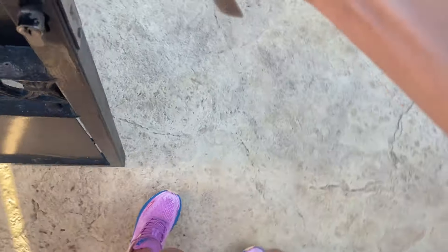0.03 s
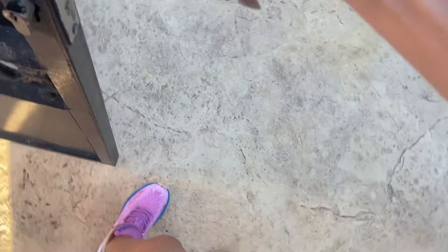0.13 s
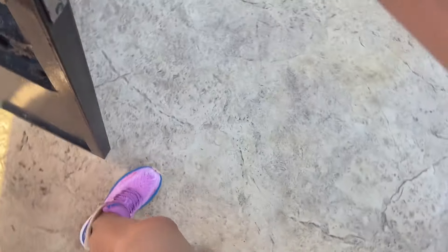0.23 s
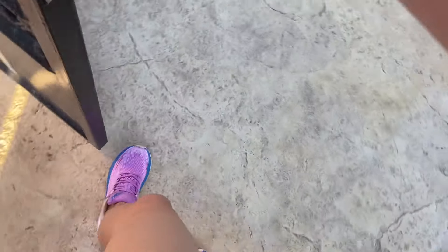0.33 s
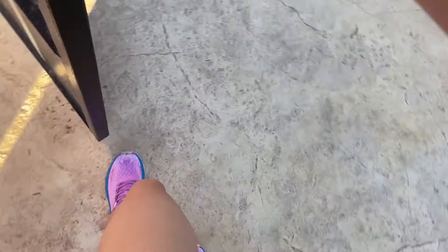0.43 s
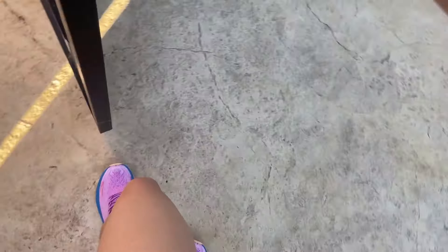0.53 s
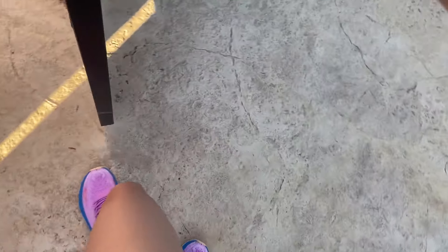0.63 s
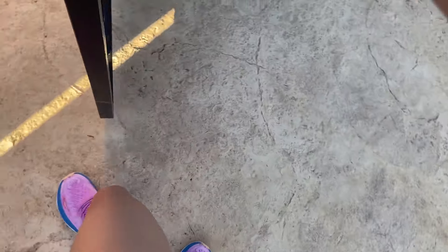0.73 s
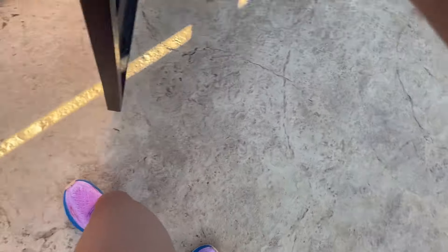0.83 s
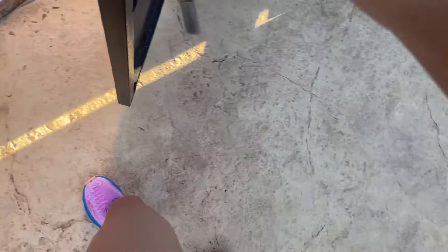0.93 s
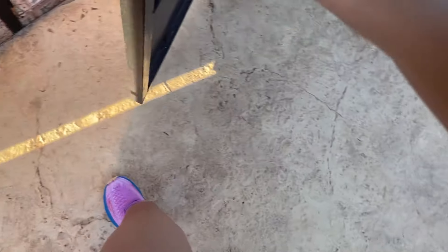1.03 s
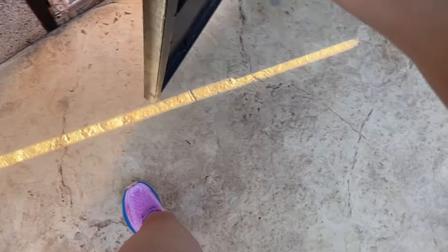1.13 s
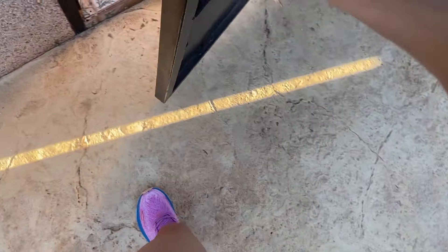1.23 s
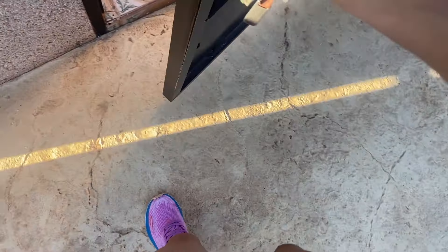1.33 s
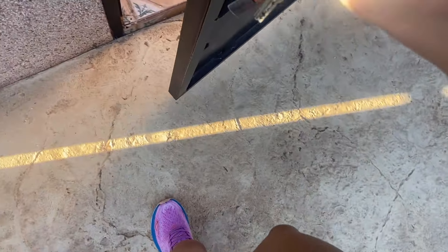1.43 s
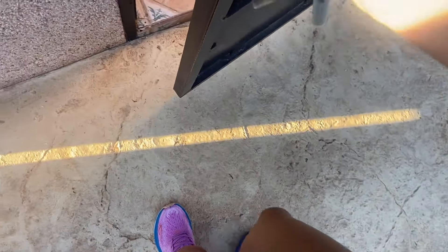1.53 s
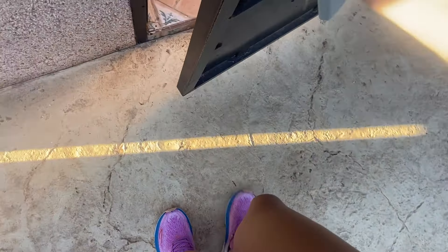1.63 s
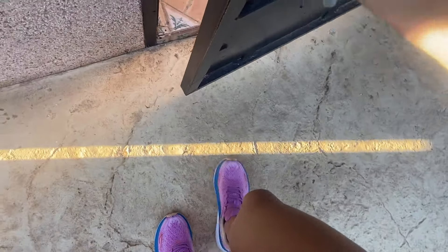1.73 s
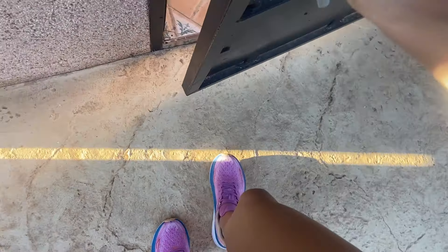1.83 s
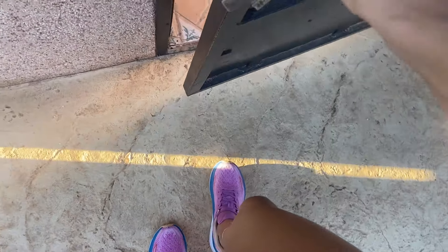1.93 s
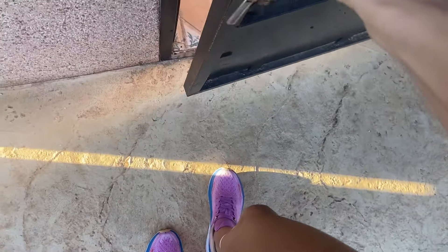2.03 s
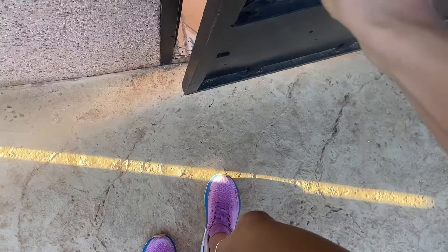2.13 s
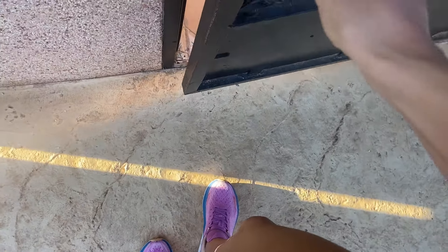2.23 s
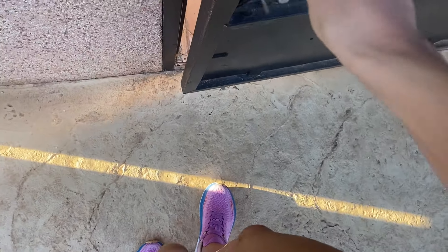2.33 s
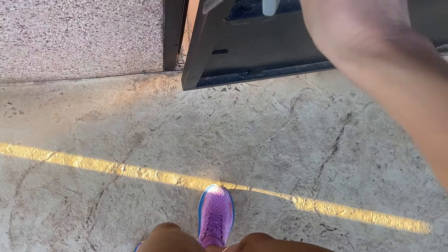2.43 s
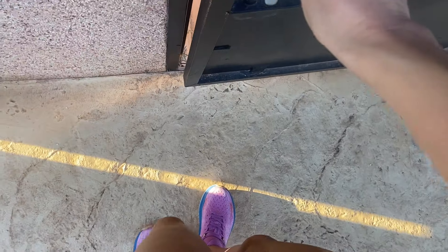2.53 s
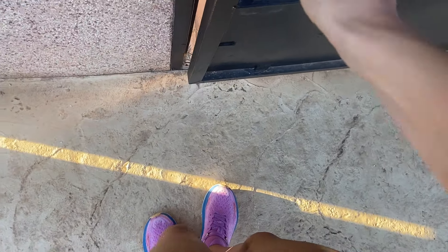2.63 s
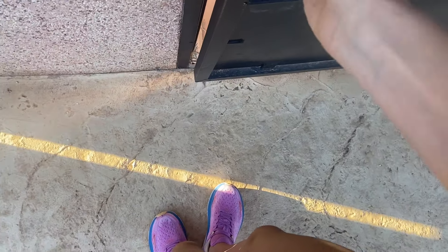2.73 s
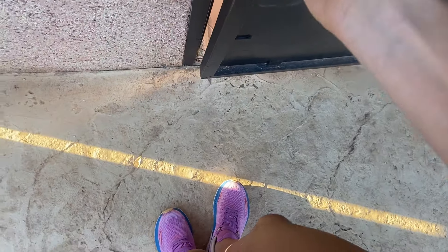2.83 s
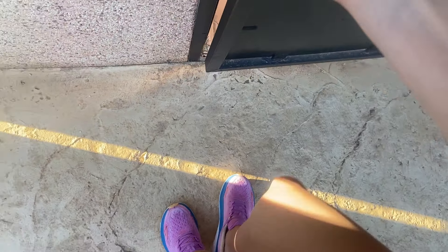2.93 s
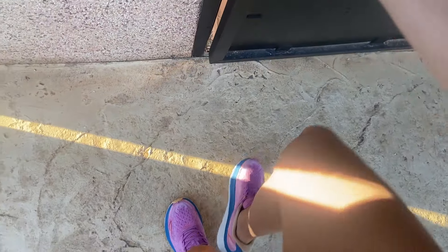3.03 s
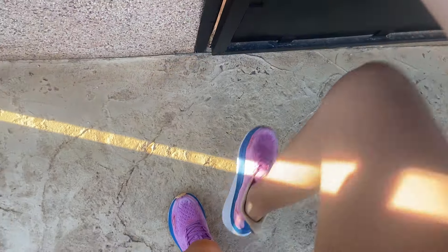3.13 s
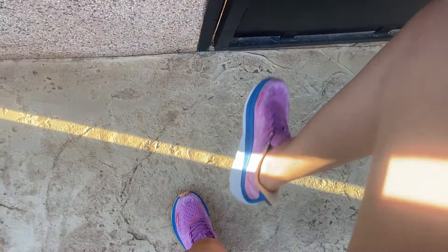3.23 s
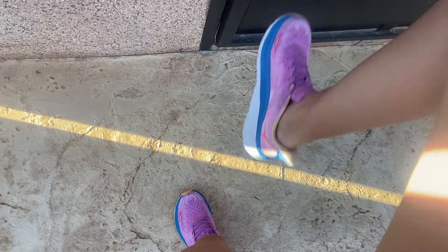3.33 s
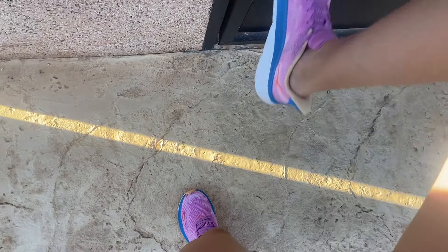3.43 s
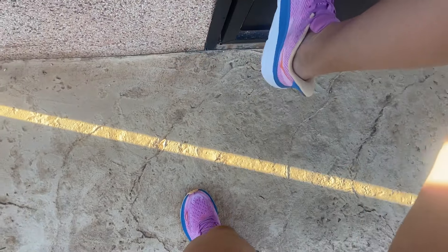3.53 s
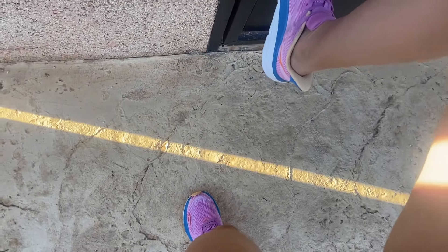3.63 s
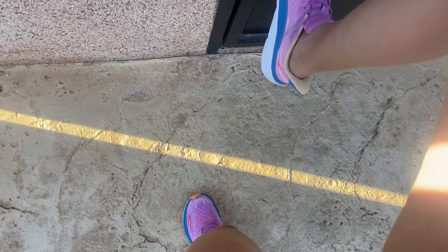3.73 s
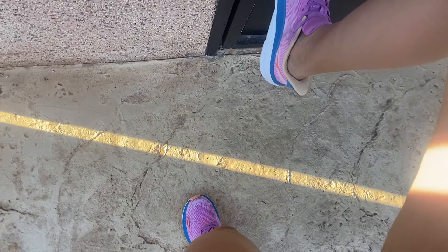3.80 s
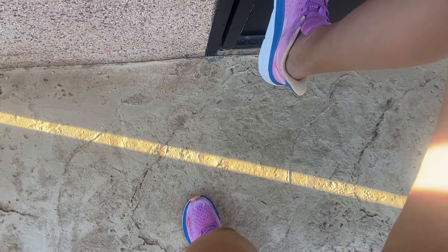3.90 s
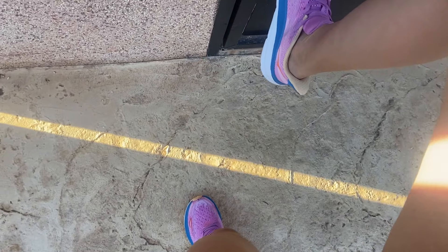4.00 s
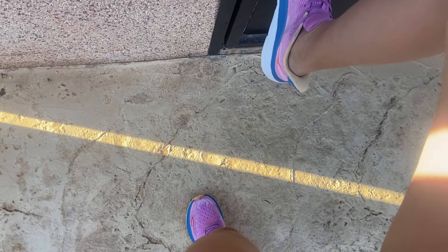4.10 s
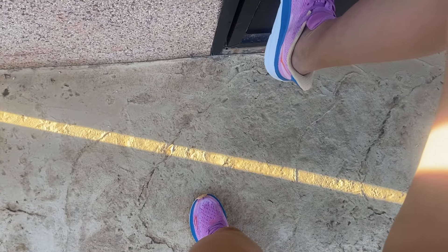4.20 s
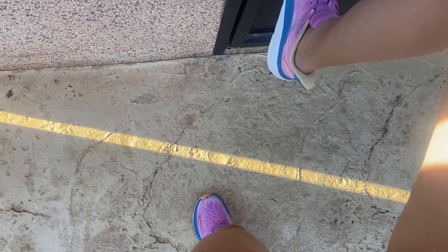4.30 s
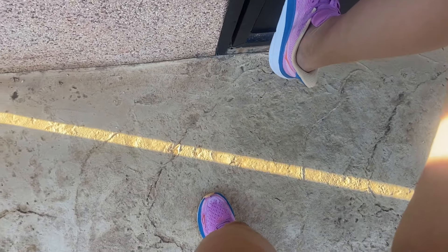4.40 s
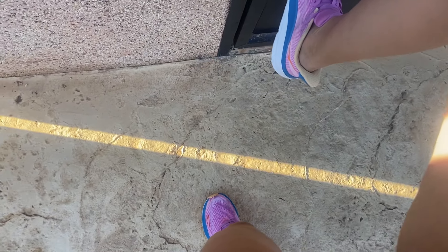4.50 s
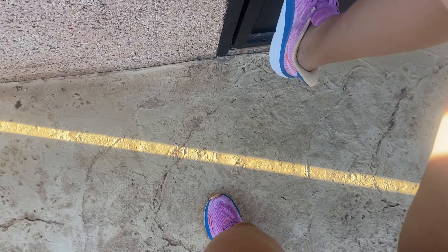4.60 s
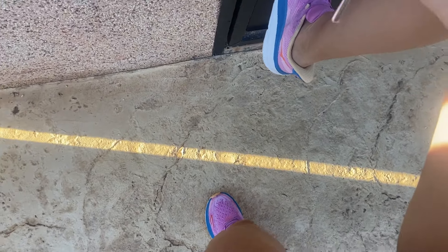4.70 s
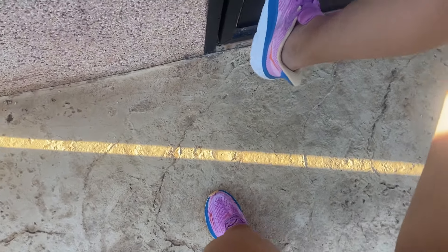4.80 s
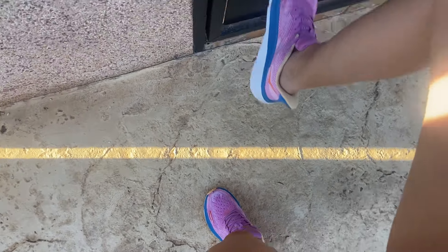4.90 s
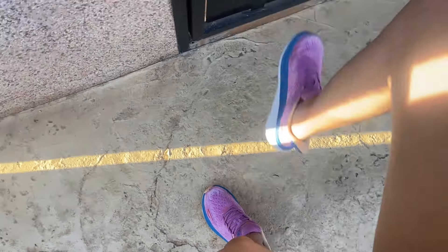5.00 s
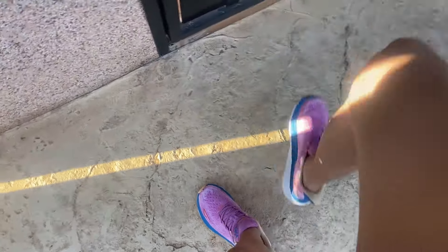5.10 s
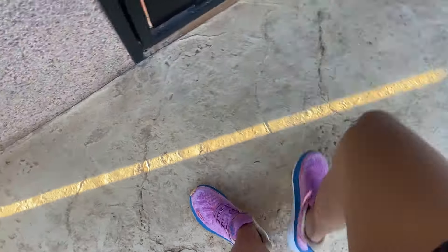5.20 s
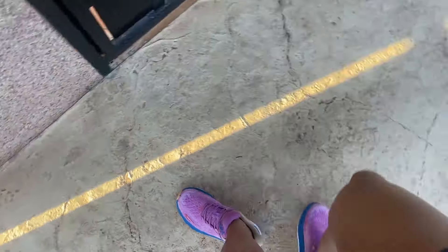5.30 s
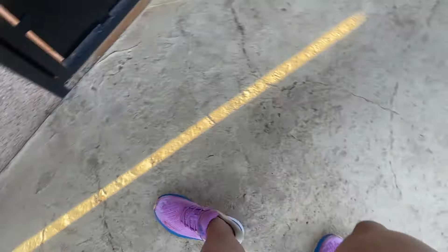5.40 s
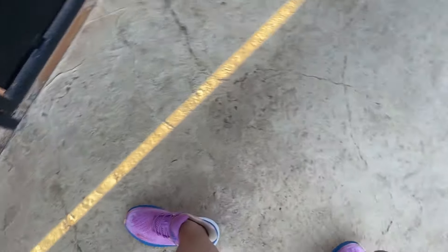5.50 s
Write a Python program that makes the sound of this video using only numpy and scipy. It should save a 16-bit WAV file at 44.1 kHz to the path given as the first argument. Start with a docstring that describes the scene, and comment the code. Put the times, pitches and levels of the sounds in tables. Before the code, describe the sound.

A metal gate's hinge squeaks in short high overlapping tones over gritty grinding for about half a second. Keys then clash and slide on their ring close by, with faint gate knocks and one soft low footfall. At about three and a half seconds the steel gate slams into its post with a massive low boom, followed by a latch click and more keys, over distant traffic. Close stereo pickup in a small hard yard, the slam slightly clipped.

```python
"""A sheet-steel gate, pushed to and kicked shut with a long low boom, in a concrete yard.
Blows ring the frame's modes and set off the panel's dying noise; post and latch bolt add short knocks.
Its hinge squeaks by even stick-slip and grinds; close by, keys clash and slide on their ring in a hand.
One soft footfall; the yard returns a short echo of hinge and keys; far traffic is shaped noise and a drone.
Two close microphone ports hear it all, with the lows and the top cut and a fast limiter on the peaks."""
import sys
import numpy as np
from scipy import signal
from scipy.fft import rfft, irfft, next_fast_len
from scipy.io import wavfile
from scipy.ndimage import uniform_filter1d, minimum_filter1d

SR = 44100
rng = np.random.default_rng(int(sys.argv[2]) if len(sys.argv) > 2 else 0)


def wav_record(signal):
    """Record a signal, one row per channel, as 16-bit PCM in the file named by sys.argv[1]."""
    frames = np.transpose(np.atleast_2d(signal))
    bounded = np.clip(frames, -1, 1)
    # unit amplitude maps onto the largest positive 16-bit level
    quanta = np.round(bounded * 32767).astype(np.int16)
    wavfile.write(sys.argv[1], SR, quanta)


N = 244755


def from_db(db):
    """Turn decibels into an amplitude factor."""
    return 10 ** (np.asarray(db) / 20)


def rms_one(x):
    """Scale x to an RMS of one."""
    return x / np.sqrt(np.mean(x ** 2) + 1e-20)


def in_time(rows):
    """Columns of a curve at every sample."""
    s, *columns = np.transpose(rows)
    return [np.interp(np.arange(N) / SR, s, c) for c in columns]


def at_hz(points, hz, column=1):
    """Read a column of a spectrum table at hz, along log frequency."""
    points = np.array(points)
    return np.interp(np.log(hz), np.log(points[:, 0]), points[:, column])


def colour(x, spectrum):
    """Give x a spectrum whose mean power gain is one, in minimum phase."""
    gain = from_db(at_hz(spectrum, np.linspace(1, SR / 2, 513)))
    response = np.roll(irfft(rms_one(gain)), 512)[1:]
    squared = np.convolve(response, response)   # minimum_phase takes the square root of its gain
    taps = signal.minimum_phase(squared, method="homomorphic")
    return signal.fftconvolve(x, taps)[:N]


def clicks(times_s, sizes):
    """Single-sample impulses at the given times."""
    out = np.full(N, 1e-18)
    samples = (np.asarray(times_s) * SR).astype(int)
    np.add.at(out, np.clip(samples, 0, N - 1), sizes)
    return out


def ring(x, hz, t60_s):
    """A damped mode: a unit click sets a sine of height 1 ringing."""
    r, w = from_db(-60 / (t60_s * SR)), 2 * np.pi * hz / SR
    return signal.lfilter([0, np.sin(w)], [1, -2 * r * np.cos(w), r * r], x)


# how alike far noise is at the two ports: pitch_hz, correlation (0 to 1)
PORT_LIKENESS = [(60, 0.99), (250, 0.99), (600, 0.54), (1200, 0.2), (2500, 0.4), (5000, 0.96),
                 (12000, 0.35)]


def bands():
    """Half-octave bands of stereo noise with their centres; neighbours are unrelated."""
    white = rng.standard_normal((2, 2, N))
    edges_hz = 25 * 2 ** np.arange(0, 9.6, .5)
    for k, (low, high) in enumerate(zip(edges_hz, edges_hz[1:])):
        band = signal.butter(2, [low, high], "band", fs=SR, output="sos")
        mid, side = signal.sosfilt(band, white[k % 2])
        hz = np.sqrt(low * high)
        alike = np.clip(at_hz(PORT_LIKENESS, hz), 0, 1)
        yield hz, np.sqrt(1 + alike) * mid + np.sqrt(1 - alike) * side * [[1], [-1]]


# blows on the gate: start_s, strength_db (relative), brightness_db (added towards the treble)
GATE_BLOWS = [(0.32, -45.5, 14.5), (1.613, -57.5, 38), (1.98, -31, 9), (2.651, -36.5, 10.5),
              (3.47, -22, -7.5), (3.497, -26, -34), (3.574, 2.5, -1.5), (3.672, -10.5, -4), (3.774, -26, 1),
              (3.922, -34.5, 23.5)]
# ringing modes of the gate's frame: pitch_hz, level_db (relative), t60_s
FRAME_MODES = [(54, 2, 2.6), (72.5, 0, 2.0), (91, -1, 1.8), (109, -1, 2.2), (145, -3, .7), (163.5, -9, 1.6),
               (168.6, 1, 2.3), (208, -8, 1.5), (228, -12, 1.8), (244, -9, 1.2), (275, -14, 1.2),
               (292, -4, 1.2), (319, -9, 1.1), (360, -15, 1.3), (447, -10, 1.6), (533, -13, 2.0),
               (556, -17, 1.0), (645, -13, 1.4), (738, -21, 1.2), (877, -17, 1.2), (1319, -26, 1.3)]
# the panel's dense modes with the yard's echo: pitch_hz, level_db (per Hz, relative), t60_s
PANEL_DECAY = [(30.2, -18.5, 0.83), (50, -1.5, 2.2), (149, -0.5, 2.16), (209, -6.5, 2.99), (299, -16, 2.46),
               (502, -12.5, 1.58), (620, -17.5, 1.9), (967, -14.5, 0.98), (1410, -23, 0.74),
               (2790, -22, 0.71), (4500, -29, 0.082), (6000, -41, 0.11), (12000, -39.5, 0.32),
               (15500, -62, 0.23)]
# the panel's lows pass through the frame's lowest modes, and leak past them
SHUDDER_T60_S, SHUDDER_DB, SHUDDER_LEAK_DB = .4, 5, -7


def treble_share(hz):
    """A bright blow favours the upper bands: 0 up to 150 Hz, 1 three octaves higher."""
    return np.clip(np.log2(hz / 150) / 3, 0, 1)


def gate_frame():
    """Blows ring the heavy frame's modes and the sheet's crowd of lesser modes."""
    s, strength_db, bright_db = np.transpose(GATE_BLOWS)
    frame = np.zeros(N)
    luck_db = rng.normal(0, 1.0, (len(s), len(FRAME_MODES)))
    for k, (hz, db, t60_s) in enumerate(FRAME_MODES):
        hit_db = strength_db + 0.42 * bright_db * treble_share(hz) + db - 10.0 + luck_db[:, k]
        hits = clicks(s, from_db(hit_db))
        frame += ring(hits, hz, t60_s) - ring(hits, hz, 32.0 / hz)   # takes some cycles to swing up
    for hz in 215 * 6.9 ** rng.random(70):   # the lesser modes
        sizes = from_db(strength_db + at_hz(PANEL_DECAY, hz) - 18.5) * rng.standard_normal(len(s))
        frame += ring(clicks(s, sizes), hz, at_hz(PANEL_DECAY, hz, column=2))
    return frame


def gate_panel(noise_bands):
    """Blows feed the sheet's noise, which dies band by band; its lows shudder through the frame."""
    s, strength_db, bright_db = np.transpose(GATE_BLOWS)
    panel, shudder = 0, 0
    for hz, noise in noise_bands:
        hit_db = strength_db + treble_share(hz) * bright_db + at_hz(PANEL_DECAY, hz) + 7.0
        hits = clicks(s, from_db(hit_db))
        fall = from_db(-60 / (at_hz(PANEL_DECAY, hz, column=2) * SR))
        crack = from_db(-60 / (0.075 * SR))   # a stronger, short first decay
        rise = np.exp(-hz / (1.5 * SR))       # lows build up over a few cycles
        envelope = signal.lfilter([1], [1, -fall], hits) + 4.1 * signal.lfilter([1], [1, -crack], hits)
        dying = signal.lfilter([1 - rise], [1, -rise], envelope) * noise
        if hz > 200:
            panel = panel + dying
        else:
            shudder = shudder + dying
    unity = 2 * (1 - from_db(-60 / (SHUDDER_T60_S * SR)))   # offsets the resonators' gain
    through_frame = sum(from_db(SHUDDER_DB + db) * unity * ring(shudder, hz, SHUDDER_T60_S)
                        for hz, db, _ in FRAME_MODES[:8])
    return panel + from_db(SHUDDER_LEAK_DB) * shudder + through_frame


SLAM_S = 3.576   # the gate meets its post
# the post's short knock: pitch_hz, level_db, t60_s
POST_KNOCK = [(155, -1, .12), (465, 2, .06), (570, -1, .05), (950, -7, .03), (2500, -8, .015)]


def post():
    """The post gives a short hard knock as the gate slams against it."""
    return sum(ring(clicks([SLAM_S], from_db(db)), hz, t60_s) for hz, db, t60_s in POST_KNOCK)


# knocks of the latch bolt: start_s, level_db (relative)
LATCH_KNOCKS = [(3.857, -3), (2.9995, -13)]
# modes of the bolt: pitch_hz, level_db (relative), t60_s
BOLT_MODES = [(2300, -7, .015), (3050, -9, .012), (3895, 0, .025), (4250, -6, .012), (4800, -9, .012)]


def latch():
    """A short steel bolt with a few quickly damped modes."""
    s, db = np.transpose(LATCH_KNOCKS)
    return sum(ring(clicks(s, from_db(db + mode_db)), hz, t60_s) for hz, mode_db, t60_s in BOLT_MODES)


SLIP_JITTER = 0.0035   # share by which the slip rate wavers


def squeak(rows, orders, slip_ends_s):
    """Slips follow so evenly that they form a tone with overtones, each trembling a little."""
    pitch_hz, level_db = in_time(rows)
    t = np.arange(N) / SR
    fade_in = np.clip((t - rows[0][0]) / 0.00068, 0, 1)
    fade_out = np.clip((rows[-1][0] - t) / 0.011, 0, 1)
    waver = np.interp(t, np.arange(300) / 400, rng.standard_normal(300))
    turn = 2 * np.pi * np.cumsum(pitch_hz * (1 + SLIP_JITTER * waver)) / SR
    fading_db = 50 * np.maximum(t - slip_ends_s, 0)   # once the slipping stops, the overtones die first
    out = np.zeros(N)
    for multiple, db in orders:
        tremble = np.interp(t, np.arange(140) / 200, rng.standard_normal(140))
        order_db = db + 1.6 * np.sqrt(multiple) * tremble - multiple * fading_db
        out += from_db(order_db) * np.sin(round(multiple) * turn + rng.uniform(0, 2 * np.pi))
    return np.sqrt(2) * from_db(level_db) * fade_in * fade_out * out


# three stick-slip squeaks of the hinge: start_s, pitch_hz, level_db (before the overtone levels)
LOW_SQUEAK = [(0.0, 798, -41.5), (0.05, 797, -37.5), (0.17, 799, -51.5)]
RISING_SQUEAK = [(0.055, 1250, -40), (0.095, 1313, -42.5), (0.165, 1314, -40), (0.22, 1360, -45)]
HIGH_SQUEAK = [(0.175, 1380, -51), (0.21, 1400, -37.5), (0.235, 1398, -34), (0.305, 1410, -31),
               (0.33, 1400, -38.5), (0.64, 1402, -54)]
# their overtones: multiple (of the pitch), level_db (relative)
LOW_OVERTONES = [(1, 5), (2, -8), (3, 7.5), (5, -5), (6, -9), (7, -5), (12, -3), (13, -13)]
RISING_OVERTONES = [(1, -0.5), (2, -13), (3, 1.5), (4, -9), (5, -1), (6, 1), (7, -4.5), (8, -10), (9, -10)]
HIGH_OVERTONES = [(1, 5.5), (2, 2), (3, -6.5), (4, -14), (5, -2), (6, 2.5), (7, -7.5), (8, -14), (9, -8)]


def hinge_squeaks():
    """The hinge sticks and slips at three overlapping pitches."""
    low = squeak(LOW_SQUEAK, LOW_OVERTONES, 0.028)
    rising = squeak(RISING_SQUEAK, RISING_OVERTONES, 0.22)
    return low + rising + squeak(HIGH_SQUEAK, HIGH_OVERTONES, 0.25)


# grinding of the pin in its sleeve: start_s, level_db
PIN_GRIND = [(0, -38), (0.06, -32.5), (0.13, -40), (0.2, -40.5), (0.25, -41), (0.36, -48.5), (0.45, -63),
             (0.5, -90)]
# modes of the hinge: pitch_hz, level_db (relative), t60_s
HINGE_RING = [(1490, 1.5, 0.039), (2000, -3, 0.0096), (2850, 1.5, 0.019), (3490, -0.5, .03),
              (4500, -17, 0.068), (6370, 4, 0.021), (8530, 3, 0.025)]


def grind():
    """Dense grit between pin and sleeve excites the hinge's modes under the squeaks."""
    rubbing = rng.standard_normal(N) * from_db(2.3 * rng.standard_normal(N))
    modes = sum(from_db(db) * rms_one(ring(rubbing, hz, t60_s)) for hz, db, t60_s in HINGE_RING)
    scrape = rms_one(colour(rubbing, DULL_SPECTRUM))
    return from_db(in_time(PIN_GRIND)[0]) * rms_one(modes + 2.0 * scrape)


# key clashes: start_s, level_db (burst, relative), clack_db (re burst), clack_pitch_hz,
# t60_s (of the rattle, at least 0.004), key_pitch_hz (the key that rings), ring_db (re burst)
KEY_CLASHES = [(0.325, -28.5, 0, 1700, 0.037, 12000, -25), (0.3542, -24, -7, 1290, 0.04, 12000, -13),
               (0.378, -32, 0, 1584, 0.022, 12000, -20), (0.4779, -16.5, -16.5, 3670, 0.022, 10380, -25),
               (0.548, -35, -3.5, 1390, 0.018, 10900, -43), (0.7171, -29, -6, 6050, 0.016, 10760, -18),
               (0.7362, -37, -9, 2230, 0.062, 11900, 7), (0.76, -14.5, -13, 2360, 0.014, 10700, -16),
               (0.7773, -26.5, 2, 2470, 0.013, 10600, -20), (0.7938, -24, -14, 1770, 0.037, 10700, -10),
               (0.8068, -27, -21, 1820, 0.024, 10700, 4), (0.818, -23, -12, 2420, 0.028, 10700, -6),
               (0.8337, -20, -1.5, 1740, 0.02, 12000, -4), (0.8582, 3.5, -22, 3800, 0.0047, 10260, -15.5),
               (0.872, -20, -2.5, 2160, 0.018, 15700, -13), (0.883, -11, -17, 2190, 0.026, 15700, -7),
               (0.927, -37, -9, 2100, 0.012, 10700, -18), (0.959, -27.5, -12, 2150, 0.016, 10700, -4),
               (1.0089, -28, -31, 4100, 0.026, 10700, 2.5), (1.017, -30, -29, 4140, 0.022, 10700, 6),
               (1.028, -30, -20, 4100, 0.012, 10700, -6), (1.036, -28, -5.5, 2000, 0.086, 10700, 5),
               (1.0545, -14, -37, 4200, 0.022, 10700, -21), (1.0709, -4, -39, 1710, 0.012, 11700, -20),
               (1.1001, -16, -9.5, 2230, 0.017, 11100, -32), (1.1681, -16, -21, 4140, 0.034, 12270, 8),
               (1.1796, -22, -3, 1690, 0.0083, 12100, -22), (1.1921, -13.5, -14, 1580, 0.027, 11200, -19),
               (1.219, -24.5, -23, 1600, 0.02, 10700, -7.5), (1.2538, -31.5, -12, 1630, 0.034, 11700, -25),
               (1.3395, -23.5, -2.5, 1410, 0.018, 15700, -9), (1.3672, -20.5, -21, 4320, 0.047, 10750, -11),
               (1.3904, -24.5, -6, 1910, 0.042, 9750, 2), (1.41, -29, -6, 1370, 0.014, 12000, -16),
               (1.446, -26, -13, 1370, 0.019, 12200, -7), (1.5995, -15.5, -32, 1570, 0.0041, 12100, -6.5),
               (1.6091, -11, -10, 2850, 0.023, 11600, -29), (1.7672, -19, -6.5, 2100, 0.027, 11700, -14),
               (1.8098, -14, -8, 2850, 0.011, 12300, -11), (1.841, -6.5, -13, 3250, 0.011, 11600, -44),
               (1.876, -19.5, -30, 2940, 0.0058, 12240, -5), (1.9224, -11.5, -5.5, 4600, 0.045, 11300, -13),
               (1.9774, 1.5, -12, 4700, 0.014, 11500, -35), (1.991, -17, -2, 2250, 0.021, 10700, -24),
               (2.0193, -14.5, -10, 2030, 0.071, 15100, -18), (2.046, -14.5, 3.5, 2200, 0.0038, 11300, -26),
               (2.07, -26, 0.5, 2200, 0.011, 10400, -14), (2.1002, -20.5, -13.5, 2230, 0.023, 10700, -22),
               (2.1474, -19.5, -24, 2020, 0.016, 10700, -11), (2.193, -17.5, -2, 2100, 0.018, 15700, -6),
               (2.2318, -26, -12, 1900, 0.032, 10700, -11.5),
               (2.2665, -21.5, -7.5, 1950, 0.039, 10700, -17), (2.328, -24, 6.5, 2300, 0.0061, 10700, -38),
               (2.441, -21.5, -15, 1520, 0.034, 15700, -4), (2.5268, -28, -4.5, 1630, 0.057, 11200, -8),
               (2.6271, -23.5, -8.5, 1820, 0.081, 11400, -16), (2.648, -12, -17, 2200, 0.024, 12000, -18),
               (2.684, -19, -12, 2090, 0.0069, 12300, -18), (2.704, -12.5, -15, 2540, 0.056, 11600, -20),
               (2.771, -22.5, -15, 2200, 0.017, 10600, -25), (2.8122, -19.5, 1.5, 1930, 0.0059, 10700, -29),
               (2.827, -28, -15, 1760, 0.02, 11500, -19), (2.8412, -16, -4, 2150, 0.065, 15700, -15),
               (2.855, -16.5, -12, 1570, 0.019, 12600, -30), (2.91, -19, -4.5, 1870, 0.0054, 11500, -16),
               (2.935, -23.5, 0, 2000, 0.017, 11000, -31), (2.946, -25, -5, 1680, 0.023, 12400, -20),
               (2.955, -22, -16, 2200, 0.01, 11500, -15), (2.974, -23, -7, 2200, 0.009, 12000, -19),
               (2.988, -19.5, -1, 4740, 0.0057, 10300, -23), (2.9992, -5, -3.5, 2680, 0.0064, 11700, -38),
               (3.0095, -16, -20, 1920, 0.022, 12300, -6), (3.015, -19.5, -4, 4100, 0.018, 12200, -38),
               (3.047, -26.5, -7, 1670, 0.064, 12100, -7), (3.076, -27, -16, 2200, 0.0091, 11500, -28),
               (3.09, -25, 0, 2500, 0.0053, 11600, -32), (3.108, -27, -4, 1940, 0.018, 10300, -31),
               (3.132, -29, -22, 2200, 0.0098, 11500, -24), (3.1778, -37.5, -13, 4000, 0.0096, 11000, -15),
               (3.202, -35, -1, 2070, 0.013, 12000, -36), (3.325, -34.5, -25, 4000, 0.008, 11500, -24),
               (3.472, -37, 12.5, 1490, 0.014, 10500, -14), (3.5872, -18, -23, 2400, 0.022, 12100, -5),
               (3.741, -31, -16, 1330, 0.018, 10700, -7), (3.773, -18, -10, 1310, 0.056, 10900, -13),
               (3.839, -14, -17, 1750, 0.02, 12700, -18), (3.844, -13.5, -12, 1490, 0.047, 12100, -6),
               (3.8572, -3.5, -2, 3800, 0.021, 11500, -6), (3.877, -15, -14, 2860, 0.024, 12000, 0.5),
               (3.9256, 3.5, -14, 4000, 0.057, 12000, -10), (3.973, -13, -13, 4500, 0.025, 11900, -36),
               (3.99, -23.5, 3.5, 6000, 0.023, 11800, -34), (4.0207, -23, -2.5, 3960, 0.016, 11300, -25),
               (4.1088, -14.5, -6.5, 2583, 0.011, 10700, -20), (4.154, -22, -20, 4100, 0.0054, 10700, -27),
               (4.171, -16, -15.5, 4000, 0.014, 12000, -25), (4.1976, -10, -11.5, 3900, 0.013, 10700, -43),
               (4.231, -32, -2, 4104, 0.0053, 12000, -23), (4.2469, -3, -9, 3570, 0.0046, 11540, -16),
               (4.262, -10.5, -13, 2130, 0.005, 11200, -30), (4.281, -24, -4, 4020, 0.01, 9900, -19),
               (4.3028, -22, 5, 4430, 0.013, 11650, -38), (4.323, -24, -6.5, 4530, 0.062, 11600, -22),
               (4.41, -25, -23, 3980, 0.0056, 11500, -18), (4.449, -22.5, -14, 2647, 0.017, 11900, -14),
               (4.469, -15.5, -17, 2360, 0.067, 11600, -10), (4.4882, -15, -12, 2850, 0.22, 11600, -3),
               (4.5102, 7, -41, 2220, 0.0087, 11100, -23), (4.5416, -15.5, -19, 1970, 0.02, 12240, 2.5),
               (4.571, -27.5, -3, 2500, 0.016, 11800, -18), (4.716, -26.5, -10.5, 3870, 0.094, 11600, -19),
               (4.74, -18, -17, 3870, 0.0071, 10900, -23), (4.7735, -27, -7.5, 2430, 0.032, 10700, -15),
               (4.9312, -9, -14, 1600, 0.018, 10700, -20), (4.9496, -7, -20, 1660, 0.013, 12000, -10.5),
               (5.1771, -31, -15, 2490, 0.022, 11100, -9), (5.195, -27.5, -13.5, 2050, 0.019, 10900, -21),
               (5.443, -20, -12, 2340, 0.0064, 11100, -36)]
# hard body of the bunch, rung by every clack: pitch_hz, level_db (before chance), t60_s
BUNCH_BODY = [(3800, -19.5, 0.002), (5000, -23, 0.0024)]
SNAP_DB = -10   # first contact of a clash, re its burst
CLACK_CYCLES, CLACK_RING_DB = 4.5, -9.5   # the clack's short resonance: t60 in cycles, level


def clashes():
    """Each clash is a tick and a grainy dying rattle, as bright hiss and as dull clack."""
    s, peak_db, dull_db, clack_hz, t60_s, _, _ = np.transpose(KEY_CLASHES)
    bright, dull = clicks(s, from_db(peak_db + SNAP_DB)), np.zeros(N)
    age = np.arange(3000) / SR
    for k, (hiss, knock, luck) in enumerate(rng.standard_normal((len(s), 3, 3000))):
        i = int(s[k] * SR)
        rebounds_db = np.repeat(luck[:100], 30)   # uneven rebounds
        rattle = from_db(-60 * age / max(t60_s[k], .004) + rebounds_db)
        swell = 1 - np.exp(-age / (0.073 * t60_s[k] + 1e-4))
        tick = 0.5 * from_db(-60 * age / 0.0028)
        shape = swell * rattle + tick
        body = sum(from_db(db + 4.2 * chance) * ring(shape * knock, hz, decay_s)
                   for (hz, db, decay_s), chance in zip(BUNCH_BODY, luck[100:]))
        resonance = ring(shape * knock, clack_hz[k], CLACK_CYCLES / clack_hz[k])
        clack = body + from_db(CLACK_RING_DB) * resonance
        bright[i:i + 3000] += (from_db(peak_db[k]) * shape * hiss)[:N - i]
        dull[i:i + 3000] += (from_db(peak_db[k] + dull_db[k]) * clack)[:N - i]
    return bright, dull


# shakes of the bunch, keys sliding on their ring: start_s, end_s, bright_db, dull_db (relative)
KEY_SHAKES = [(0, 0.08, -38, -56), (0.317, 0.311, -35.5, -39.5), (0.397, 0.477, -54, -49.5),
              (0.72, 0.787, -62, -42), (0.825, 0.895, -33.5, -41), (0.983, 1.007, -49, -47.5),
              (1.017, 1.118, -38, -52), (1.166, 1.222, -45, -43), (1.337, 1.436, -51, -52),
              (1.618, 1.646, -42, -43.5), (1.78, 1.852, -58, -37.5), (1.944, 2.036, -34.5, -31.5),
              (2.21, 2.333, -42.5, -43.5), (2.51, 2.576, -50, -52), (2.628, 2.749, -40, -38.5),
              (2.813, 3.123, -55, -47), (3.64, 3.658, -33.5, -27.5), (3.765, 3.777, -36, -55),
              (3.85, 3.964, -31, -29.5), (4.068, 4.346, -45.5, -43.5), (4.502, 4.538, -38.5, -33),
              (4.715, 4.944, -51, -57), (5.117, 5.547, -64, -54)]
SWELL_DB_PER_S, SETTLE_DB_PER_S = 322, 185   # before and after a shake


def shaking():
    """Each shake swells, holds and settles; returns bright and dull gains."""
    t = np.arange(0, N + 64, 64) / SR
    start, end, *levels_db = np.transpose(KEY_SHAKES)[:, :, None]
    shape_db = -SWELL_DB_PER_S * np.maximum(start - t, 0) - SETTLE_DB_PER_S * np.maximum(t - end, 0)
    return [np.interp(np.arange(N) / SR, t, from_db(db + shape_db).sum(axis=0)) for db in levels_db]


def grit(low_hz, high_hz):
    """Small contacts come in clumps; each rings a few cycles at one of eight pitches."""
    knots = np.arange(0, N + 400, 400)
    clumps = np.interp(np.arange(N), knots, rng.exponential(1, len(knots)))
    contacts = rng.random(N) < 800 * clumps / SR   # 800 a second on average
    sizes = from_db(3.74 * np.minimum(rng.exponential(1, N), 5))
    ticks = contacts * sizes * rng.choice([-1, 1], N)
    dealt = rng.integers(0, 8, N)
    rings = sum(ring(ticks * (dealt == k) + 1e-18, hz, 1.5 / hz)
                for k, hz in enumerate(np.geomspace(low_hz, high_hz, 8)))
    return rms_one(rms_one(rings) + 0.46 * rng.standard_normal(N))


# three keys, each a list of modes: pitch_hz, level_db (relative), t60_s (in an open hand)
KEY_RING = [
    [(10655, -4, .08), (10710, 0, .12), (10767, -3, .08), (10850, -8, .08), (7550, -14, .07)],
    [(11975, 0, .05), (12075, -2, .045), (13650, -9, .05), (9950, -12, .04)],
    [(15620, -6, .08), (15715, 0, .13), (15000, -12, .06), (5850, -23, .06)],
]
# spectra of the hiss and of the clack: pitch_hz, level_db (per Hz, relative)
BRIGHT_SPECTRUM = [(4000, -23.5), (6000, -14), (7200, -13), (8800, -9.5), (10500, -10.5), (12000, -3.5),
                   (13600, -9.5), (15500, -11), (16500, -13.5)]
DULL_SPECTRUM = [(400, -16), (1150, -12), (1650, 0), (2550, 0), (3150, -10), (3800, 0), (4250, -5),
                 (4700, -1), (5400, -8), (6050, -4), (7500, -16)]
OTHER_KEY_DB_PER_OCTAVE = 98   # keys further from the struck one ring less
GRIP_S, GRIP_DAMPING = 3.4, .5   # from then on the hand closes on the keys and shortens their ring


def keys():
    """Clashes set the keys ringing; sliding adds small ticks that ring them faintly."""
    s, peak_db, _, _, _, key_hz, ring_db = np.transpose(KEY_CLASHES)
    bright, dull = clashes()
    slide_bright, slide_dull = shaking()
    small = slide_bright * grit(6300, 16400)
    small_dull = slide_dull * from_db(-6) * grit(1110, 6000)
    out = colour(bright + small, BRIGHT_SPECTRUM) + colour(dull + small_dull, DULL_SPECTRUM)
    free = np.arange(N) < GRIP_S * SR
    for modes in KEY_RING:
        key_db = ring_db - OTHER_KEY_DB_PER_OCTAVE * np.abs(np.log2(key_hz / modes[1][0]))
        for hz, db, t60_s in modes:
            luck_db = rng.normal(0, 1.4, len(s))
            struck = clicks(s, from_db(peak_db + key_db + db + luck_db))
            struck = struck + from_db(db - 55) * small
            out += ring(struck * free, hz, t60_s)
            out += ring(struck * ~free + 1e-18, hz, GRIP_DAMPING * t60_s)
    return out


FOOTFALL_S = 1.108   # one soft step
FOOTFALL_DB, FOOTFALL_HZ, FOOTFALL_T60_S = -19.5, 56, 0.11


def footfall():
    """A cushioned sole pushes the ground: a low thump that swells and dies."""
    step = clicks([FOOTFALL_S], from_db(FOOTFALL_DB))
    return ring(step, FOOTFALL_HZ, FOOTFALL_T60_S) - ring(step, FOOTFALL_HZ, 0.19 * FOOTFALL_T60_S)


YARD_T60_S, YARD_DB = 0.055, -11.5


def yard(x):
    """Walls and floor return a dying, dull cloud of echoes, another one on each side."""
    age = np.arange(int(.6 * SR)) / SR
    tails = rng.standard_normal((2, len(age))) * from_db(-60 * age / YARD_T60_S) * (age > .004)
    tails = signal.lfilter([1], [1, -.6], tails)
    tails /= np.sqrt(np.sum(tails ** 2, axis=1, keepdims=True))
    return from_db(YARD_DB) * signal.fftconvolve(x[None], tails, axes=1)[:, :N]


# spectrum of the far traffic: pitch_hz, level_db (per Hz, relative)
TRAFFIC_SPECTRUM = [(18, -20), (30, 11), (89, -2.5), (282, -17.5), (322, -20), (367, -14.5), (598, -19.5),
                    (932, -18.5), (1390, -24.5), (1980, -26), (6000, -50.5), (7500, -49.5), (10000, -51.5),
                    (12500, -48), (14500, -78)]
# its level over time: start_s, level_db (before the port filters)
TRAFFIC_LEVEL = [(0.0, -36.5), (0.59, -43), (1.85, -36.5), (3.45, -35.5), (5.0, -28.5), (5.55, -25.5)]
# low engine drone: pitch_hz, level_db (re traffic noise), t60_s
DRONE_MODES = [(57.7, -7.5, 0.18), (86, -15, 0.07)]


def traffic(noise_bands):
    """Far traffic is noise weighted band by band, with a low drone of noise-driven resonances."""
    road = sum(from_db(at_hz(TRAFFIC_SPECTRUM, hz)) * noise for hz, noise in noise_bands)
    drone = sum(from_db(db) * rms_one(ring(rng.standard_normal(N), hz, t60_s))
                for hz, db, t60_s in DRONE_MODES)
    return from_db(in_time(TRAFFIC_LEVEL)[0]) * (rms_one(road) + drone)


def scene():
    """Gate, post and latch; hinge and keys close by with the yard's echo; a step; far traffic."""
    noise_bands = list(bands())   # gate panel and traffic share these bands
    gate = gate_frame() + gate_panel(noise_bands)
    near = keys() + hinge_squeaks() + grind()
    return gate + post() + latch() + near + yard(near) + footfall() + traffic(noise_bands)


# phase between the microphone ports: pitch_hz, lead_rad (by which the left port leads)
PORT_LEAD = [(0, 0), (430, -0.0), (950, -1.4), (1460, 0.3), (3880, 0.7), (4910, 0.0), (5340, 0.2),
             (6550, 2.7), (7840, 3.4), (9730, 5.8), (10900, 6.6), (13200, 9.3), (14300, 9.8), (15900, 12.4)]
# level between the ports: pitch_hz, level_db (left re right)
PORT_TILT = [(60, 0.5), (180, -2.5), (550, -1.5), (1650, -2.5), (4970, -0.5), (15000, 0)]
LOW_CUT_HZ, CUTOFF_HZ = 62.8, 16000
TOP, OVERSHOOT = 1.0, 1.06   # the limiter lets the very tips clip


def record(dry):
    """Two close ports differ in phase and level; the lows and the top are cut; a fast limiter holds the boom."""
    size = next_fast_len(N + 2048)
    hz = np.arange(size // 2 + 1) * SR / size
    lead = np.interp(hz, *np.transpose(PORT_LEAD))
    tilt = from_db(at_hz(PORT_TILT, hz + 1) / 2)
    ports = np.array([tilt * np.exp(.5j * lead), np.exp(-.5j * lead) / tilt])
    x = irfft(rfft(dry, size) * ports, size)[:, :N]
    x = signal.sosfilt(signal.butter(4, LOW_CUT_HZ, "high", fs=SR, output="sos"), x)
    allowed = np.minimum(OVERSHOOT * TOP / (np.abs(x).max(axis=0) + 1e-9), 1)
    # gain dips for a few ms round each peak
    x = x * uniform_filter1d(minimum_filter1d(allowed, size=121), size=121)
    x = signal.sosfilt(signal.cheby2(10, 60, CUTOFF_HZ + 700, fs=SR, output="sos"), x)
    return np.clip(x, -TOP, TOP)


dry = scene()
out = record(dry)
wav_record(out)
```